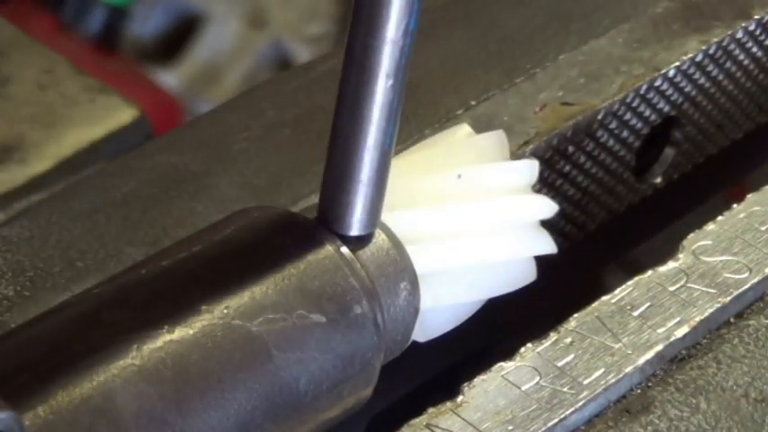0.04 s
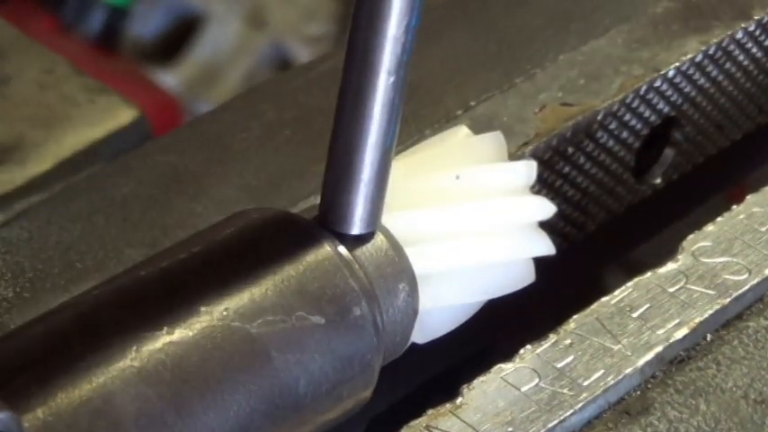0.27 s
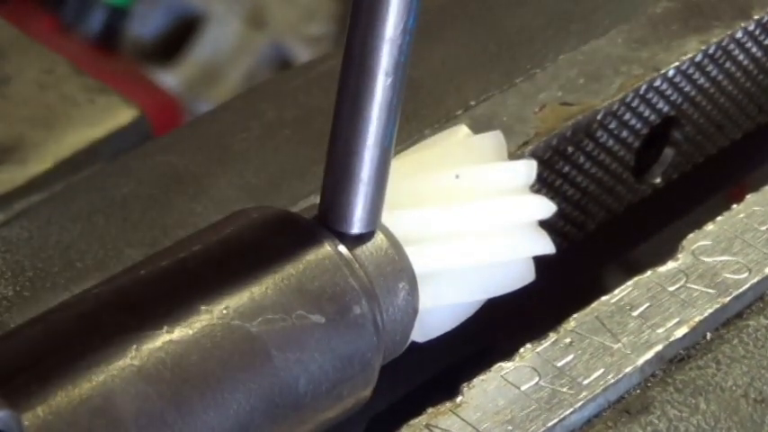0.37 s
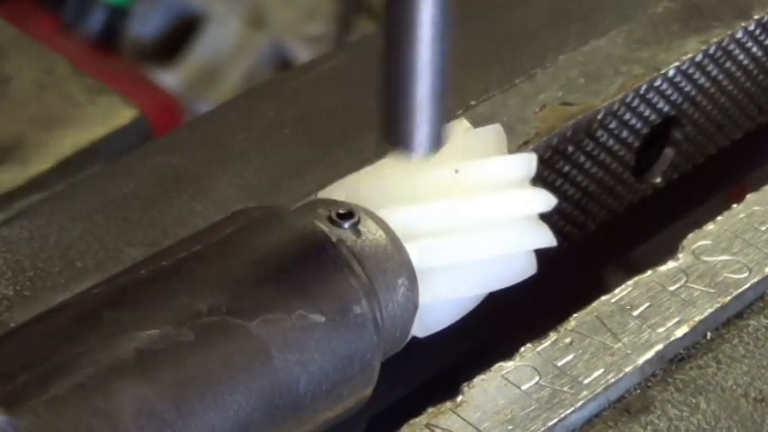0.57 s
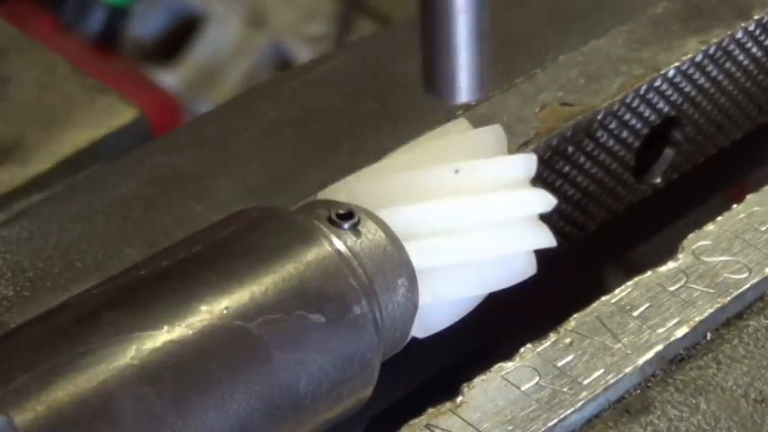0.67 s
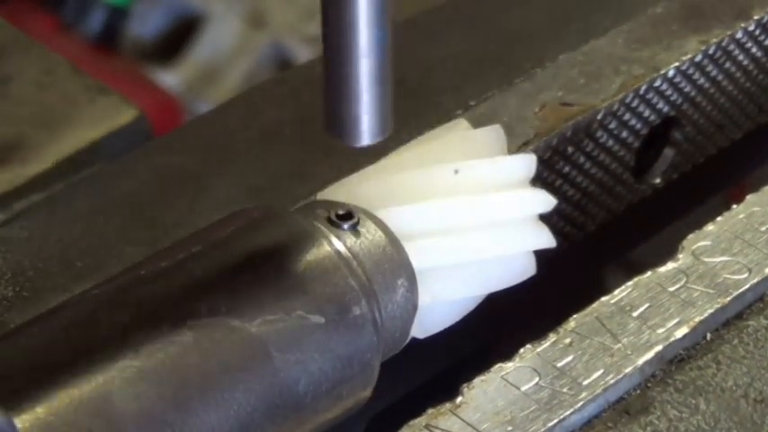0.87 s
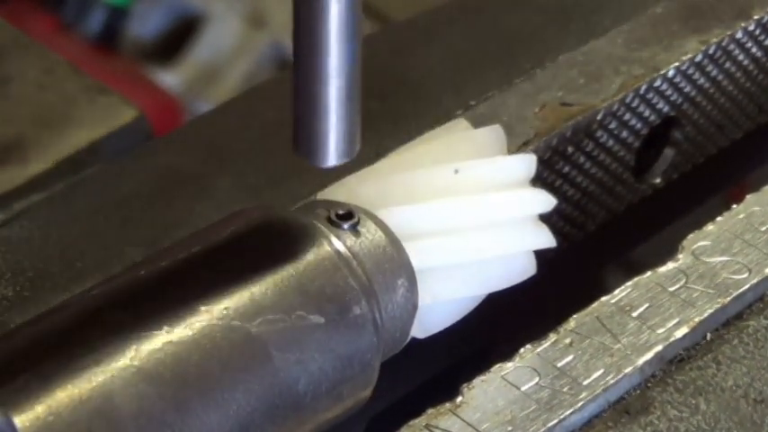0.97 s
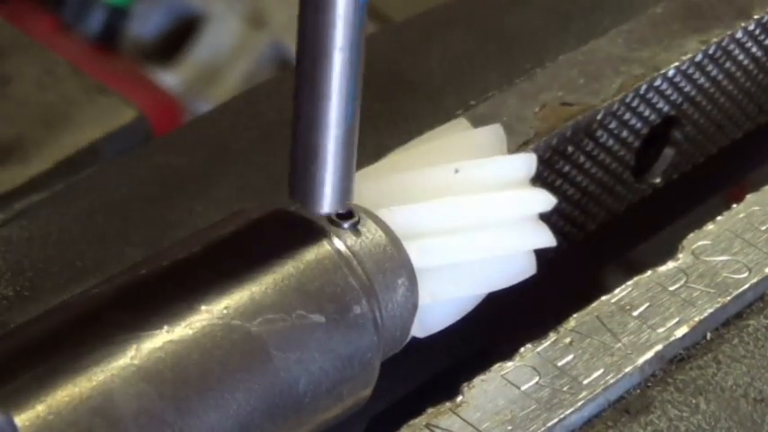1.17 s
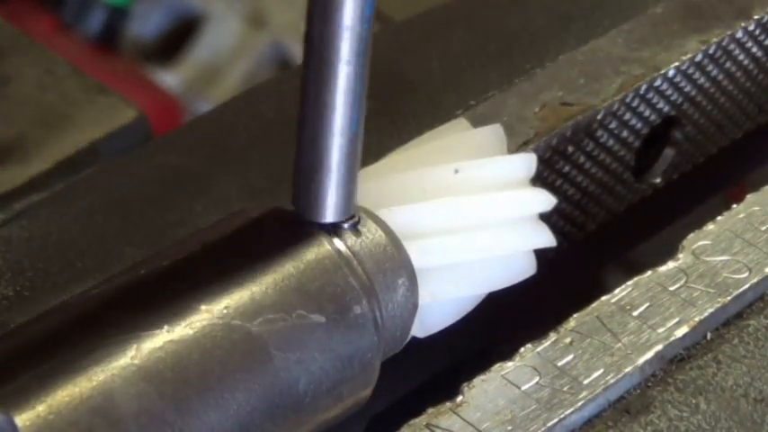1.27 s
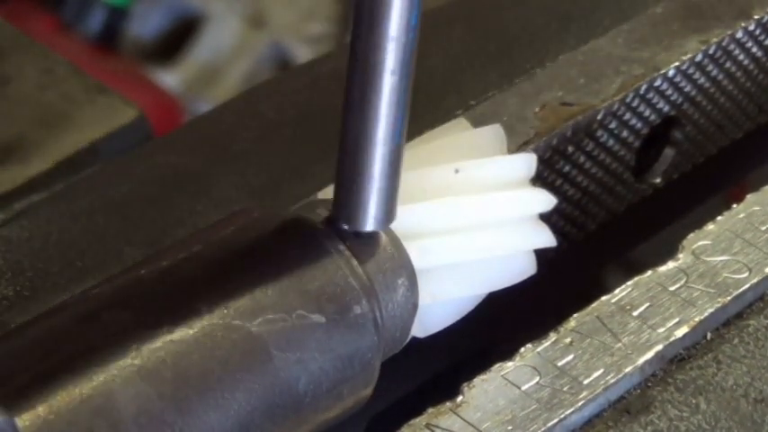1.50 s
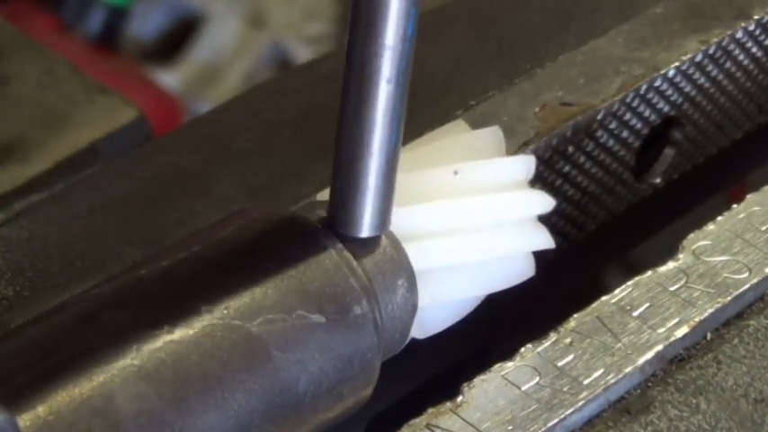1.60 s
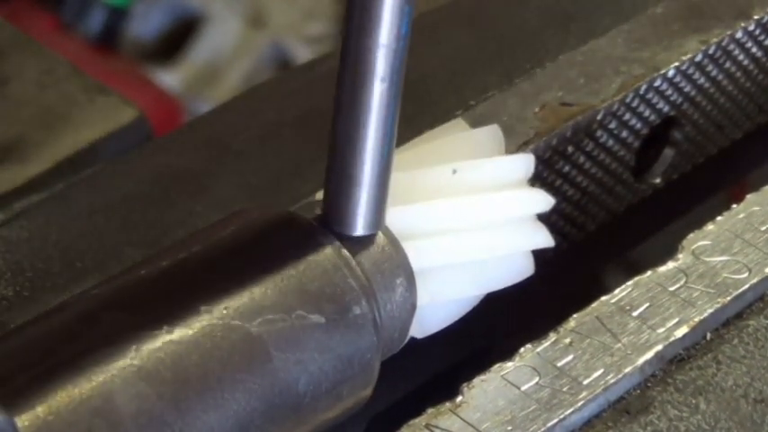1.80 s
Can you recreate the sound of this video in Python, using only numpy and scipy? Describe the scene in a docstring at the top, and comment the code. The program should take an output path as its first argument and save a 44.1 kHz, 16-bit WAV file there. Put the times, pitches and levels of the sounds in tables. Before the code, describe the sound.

One sharp, ringing hammer blow on a steel punch, then light ticks in a workshop.

```python
"""A small workshop with a low hum. At 0.2 s a hammer hits a steel punch held on a shaft in a vise, close by.
The blow cracks, chatters and rebounds, ringing punch, hammer head and vise. A dense room echo swells,
holds briefly and fades; a faint steel ring lingers. Near 0.5 s the punch ticks as it is lifted off.
From 1.3 s it is set down again and steered into place, with more ticks and a dull rub."""
import sys
import numpy as np
from scipy import signal
from scipy.fft import rfft, irfft
from scipy.io import wavfile

SR = 44100
rng = np.random.default_rng(int(sys.argv[2]) if len(sys.argv) > 2 else 0)


def digitize_waveform(pressure):
    """Quantize a signal to 16-bit integers and store it at the path in sys.argv[1].

    Rows of a 2-D input are taken as channels; values are limited to [-1, 1].
    """
    field = np.atleast_2d(pressure).T
    bounded = np.clip(field, -1, 1)
    quanta = np.round(bounded * 32767).astype(np.int16)
    wavfile.write(sys.argv[1], SR, quanta)


N = 81585

# Blow, chatter, rebound. Each row: start in seconds, then crack, punch, hammer and vise levels in dB.
HAMMER_HITS = [(0.2098, -13, -17.5, -35, -34), (.2128, -18, -50.5, -58.5, -48.5),
               (.2213, -20.5, -40, -51.5, -50), (.2540, -23, -38, -29.5, -36.5)]
# Modes of the punch and of the vise on its bench. Each row: frequency in Hz, level in dB, t60 in seconds.
PUNCH_MODES = [(3032, -19, .26), (4700, -6, .035), (6100, -6, .03), (6513, -17, .2), (7391, -19, .2),
               (8904, -12, .06), (9487, -6, .13), (9569, -3, .13), (9815, -11, .14), (10297, -10, .11),
               (10938, -3, .1), (11455, -12, .15), (11836, -16, .16)]
VISE_MODES = [(372, -8, .18), (441, -3, .15), (506, -2, .14), (635, -7, .11), (868, -5.5, .19),
              (1140, -6, .12), (1511, -12, .1), (1945, -8, .09), (2200, -8, .11), (2600, -11, .1),
              (2880, -8, .1), (3250, -10, .06)]

SLOW_RISE_S = .02  # vise ring and low tones after the blow
CONTACT_LOW_HZ = 260.1  # small parts radiate no bass


def undb(db):
    """Decibels to gain."""
    return 10 ** (np.asarray(db) / 20)


def db_at(table, hz):
    """Interpolate (Hz, dB) rows over log frequency."""
    rows = np.array(table, float)
    return np.interp(np.log(np.maximum(hz, 1)), np.log(rows[:, 0]), rows[:, 1])


def fade(t, t60):
    """Exponential decay, 60 dB down at t60."""
    return np.exp(-np.log(1000) * t / t60)


def low_cut(x, hz):
    """Third-order high-pass."""
    return signal.sosfilt(signal.butter(3, hz, "high", fs=SR, output="sos"), x)


def add(out, start_s, sound):
    """Mix a sound in at start_s."""
    i = int(start_s * SR)
    out[:, i:i + sound.shape[1]] += sound[:, :N - i]


def noise(spectrum, size, width=.36, colour_db=0):
    """Stereo noise shaped by (Hz, dB) rows, mid at rms 1. The default width suits close sounds."""
    # Diffuse field. Each row: frequency in Hz, side over mid in dB.
    side_spectrum = [(50, -31.5), (150, -25.5), (330, -15.5), (700, -4), (3000, -6), (6000, -6.5),
                     (10000, -17)]
    hz = np.fft.rfftfreq(size, 1 / SR)
    gain = undb(db_at(spectrum, hz) + colour_db)
    phasors = np.exp(2j * np.pi * rng.random((2, len(hz))))
    side_gain = width * undb(db_at(side_spectrum, hz))
    mid, side = irfft(gain * phasors * [np.ones(len(hz)), side_gain], size)
    return np.array([mid + side, mid - side]) / mid.std()


def ring(modes, size, t60_scale=1, rise_s=0.000091):
    """Struck modes: sines that swing up and fade, slightly out of phase between the ears."""
    t = np.arange(size) / SR
    out = np.zeros((2, size))
    for hz, db, t60 in modes:
        lag_rad = 0.11 * rng.standard_normal() * np.array([[1], [-1]])
        out += undb(db) * fade(t, t60 * t60_scale) * np.sin(2 * np.pi * hz * t + lag_rad)
    return out * (1 - np.exp(-t / rise_s))


def scatter(modes, spread_db=3):
    """Each point of contact wakes the modes a little differently."""
    return [(hz, db + spread_db * rng.standard_normal(), t60) for hz, db, t60 in modes]


def background():
    """Quiet workshop air and a wavering two-tone hum."""
    # Air spectrum and hum tones. Each row: frequency in Hz, relative level in dB.
    air_spectrum = [(25, -21), (55, 1.5), (90, -8.5), (160, -4), (260, -9.5), (480, -11.5), (900, -18),
                    (2000, -23.5), (5000, -28), (11000, -31), (15000, -31.5), (16000, -25.5)]
    hum_tones = [(117.5, -1), (161, -6)]
    # Hum envelope. Each row: time in seconds, level in dB.
    hum_envelope = [(0, -67.5), (.12, -62.5), (.19, -85.5), (.6, -67.5), (1.1, -70), (1.35, -71),
                    (1.55, -64.5), (1.7, -62.5), (1.85, -65)]
    t = np.arange(N) / SR
    knots_s = np.linspace(0, t[-1], 24)
    envelope_db = np.interp(t, *np.array(hum_envelope).T)
    out = undb(-63) * noise(air_spectrum, N, width=.8)
    for hz, db in hum_tones:
        waver_db = np.interp(t, knots_s, -0.5 * rng.standard_normal(len(knots_s)))
        drift_rad = np.interp(t, knots_s, 0.66 * rng.standard_normal(len(knots_s)))
        out += undb(db + envelope_db + waver_db) * np.sqrt(2) * np.sin(2 * np.pi * hz * t + drift_rad)
    return out


def room(x):
    """Short, dull workshop echo; the treble dies sooner."""
    t = np.arange(SR // 2) / SR
    hz = np.fft.rfftfreq(len(t), 1 / SR)
    diffuse = noise([(100, 0), (3500, 0), (16000, -14)], len(t), width=1)
    treble = irfft(rfft(diffuse) * (hz > 5000), len(t))
    response = (diffuse - treble) * fade(t, t60=.35) + treble * fade(t, t60=.28)
    response *= 1 - np.exp(-t / .004)
    response /= np.sqrt(np.sum(response[0] ** 2))
    return undb(-13) * signal.fftconvolve(x, response, axes=1)[:, :N]


def rubbing():
    """The punch rubs dully as it is steered into place."""
    # Each row: frequency in Hz, relative density in dB.
    spectrum = [(100, -25.5), (300, -6), (440, 8), (600, -9.5), (900, -4.5), (1500, -24), (6000, -37.5)]
    # Each row: time in seconds, level in dB.
    envelope = [(1.28, -80.5), (1.34, -60), (1.42, -69.5), (1.52, -69.5), (1.66, -73.5), (1.76, -87)]
    level_db = np.interp(np.arange(N) / SR, *np.array(envelope).T)
    return noise(spectrum, N) * undb(level_db)


def punch_ticks():
    """The punch leaves the shaft, lands and skips; each touch clicks and rings punch, shaft and vise."""
    # Each row: start in seconds, click level in dB, tilt in dB per octave, favoured band in Hz,
    # click t60 in seconds, then punch, shaft and vise levels in dB.
    touches = [(.4972, -50.5, 3, 7200, 0.034, -79.5, -83.5, -59.5),
               (0.5447, -35, 3, 1480, 0.04, -35.5, -39, -56.5),
               (0.5533, -37, 4, 9400, 0.011, -56, -59, -65),
               (1.2827, -42.5, -4, 4400, 0.031, -49, -75, -45),
               (1.2866, -42, -2, 592, 0.034, -72, -65, -65),
               (1.3331, -60, 10, 11000, 0.034, -72, -60, -56.5),
               (1.3443, -59, -2.5, 480, 0.045, -78, -83, -65), (1.611, -37, 1, 2523, .025, -60, -68, -67),
               (1.6153, -50, -3, 9000, 0.019, -66, -74, -72), (1.6202, -49, -7, 552, 0.065, -62, -63, -74),
               (1.6266, -40, 6, 8250, 0.011, -60, -71, -60.5)]
    # Each row: frequency in Hz, relative density in dB.
    click_spectrum = [(60, -47), (250, -13), (600, -6.5), (1600, -1), (3000, -2), (5000, -4), (8000, -4.5),
                      (11500, -7), (13500, -16), (16000, -27)]
    # Each row: frequency in Hz, level in dB, t60 in seconds.
    shaft_modes = [(1141, -5, .06), (1290, -12, .06), (1529, 0, .055), (1610, -5, .05), (1790, -3, .05),
                   (2611, -15, .13), (2950, -16, .12)]
    band_db, band_octaves = 6, 0.54  # each point of contact favours its own band
    out, size = np.zeros((2, N)), SR // 3
    t, hz = np.arange(size) / SR, np.fft.rfftfreq(size, 1 / SR)
    for start_s, click_db, tilt_db, band_hz, t60, punch_db, shaft_db, vise_db in touches:
        octaves = np.log2(np.maximum(hz, CONTACT_LOW_HZ) / band_hz)
        colour_db = tilt_db * octaves + band_db * np.exp(-(octaves / band_octaves) ** 2)
        click = undb(click_db) * noise(click_spectrum, size, colour_db=colour_db) * fade(t, t60)
        punch = undb(punch_db) * ring(scatter(PUNCH_MODES), size, t60_scale=.2)
        shaft = undb(shaft_db) * ring(shaft_modes, size)
        vise = undb(vise_db) * ring(scatter(VISE_MODES), size, rise_s=0.0026)
        add(out, start_s, click + punch + shaft + vise)
    return out


def swelling_echo():
    """After the blow a dense room echo swells, holds and fades, with low tones and a faint steel ring."""
    # Each row: band centre in Hz, relative density in dB, t60 in seconds.
    bands = [(30, -21, 0.51), (59.4, -3.5, 0.71), (150, -9.5, .5), (320, 4.5, 0.36), (480, 1, 0.36),
             (754, -4, 0.45), (1290, -2.5, 0.42), (1850, 5, 0.34), (2400, -5.5, 0.42), (3400, 1.5, 0.34),
             (4800, -7.5, 0.39), (6700, -4, 0.27), (8700, -10, 0.34), (9750, -0.5, .23), (11200, -4, 0.26),
             (12700, -14, .22), (16000, -24, .22)]
    # Each row: frequency in Hz, level in dB, t60 in seconds.
    low_tones = [(54, -54, .65), (76, -49, .3), (306, -32, .36), (441, -28, .24), (517, -33, .25),
                 (870, -41, .42), (1511, -29, .27), (1873, -26.5, .29), (2418, -43, .72), (2428, -44, .68)]
    steel_modes = [(2950, -9, 2.2), (3774, -10, 2.1), (4048, -7, 2.1), (4535, -8, 1.8), (4554, -2, 2.4),
                   (5050, -12, 2), (5432, -7, 1.9), (6471, -4, 1.6), (6788, -6, 1.4), (7967, -6, 1.5),
                   (8090, -5, .9), (8900, -6, 1.1)]
    start_s, hold_s = HAMMER_HITS[0][0], 0.038
    out, t = np.zeros((2, N)), np.arange(SR) / SR
    spectrum, hz = rfft(noise(bands, SR, width=1)), np.fft.rfftfreq(SR, 1 / SR)
    centres_hz = np.array(bands)[:, 0]
    for share, (centre_hz, _, t60) in zip(np.eye(len(bands)), bands):
        band = irfft(spectrum * np.interp(hz, centres_hz, share), SR)
        rise_s = 0.025 * (1000 / centre_hz) ** 0.24  # lows come later
        envelope = (1 - np.exp(-t / rise_s)) * fade(np.maximum(t - hold_s, 0), t60)
        add(out, start_s, undb(-22) * band * envelope)
    add(out, start_s, ring(low_tones, N, rise_s=SLOW_RISE_S))
    add(out, start_s, undb(-57) * ring(steel_modes, N))
    return out


def hammer_blow():
    """Steel on steel: each hit cracks and rings punch, hammer head and vise."""
    # Each row: frequency in Hz, relative density in dB.
    crack_spectrum = [(100, -15.5), (400, -17.5), (1200, -2.5), (2500, -0.5), (5000, -4), (7500, -2),
                      (10500, 3.5), (13000, -0.5), (16000, -13.5)]
    # Each row: frequency in Hz, level in dB, t60 in seconds.
    hammer_modes = [(6513, -10, .15), (10836, 0, .15)]
    out, size = np.zeros((2, N)), SR // 2
    t = np.arange(size) / SR
    for start_s, crack_db, punch_db, hammer_db, vise_db in HAMMER_HITS:
        crack = undb(crack_db) * noise(crack_spectrum, size) * fade(t, t60=.03)
        punch = undb(punch_db) * ring(PUNCH_MODES, size)
        hammer = undb(hammer_db) * ring(hammer_modes, size)
        vise = undb(vise_db) * ring(VISE_MODES, size, rise_s=SLOW_RISE_S)
        add(out, start_s, crack + punch + hammer + vise)
    return out


def scene():
    """The work and its echo, slightly to the left, over the background."""
    # Each row: frequency in Hz, left minus right in dB.
    balance = [(70, -1), (170, 2), (350, 3), (700, 4), (1400, 3.3), (2800, 0.54), (5500, 1.6), (13000, 0.6)]
    contacts = low_cut(hammer_blow() + punch_ticks() + rubbing(), CONTACT_LOW_HZ)
    work = contacts + room(contacts) + swelling_echo()
    balance_db = db_at(balance, np.fft.rfftfreq(N, 1 / SR))
    ear_gains = undb(np.array([balance_db, -balance_db]) / 2)
    return irfft(rfft(work) * ear_gains, N) + background()


def record(dry):
    """Band-limit to 36 Hz - 16.1 kHz."""
    low_pass = signal.ellip(10, .2, 80, 16100, fs=SR, output="sos")
    return signal.sosfilt(low_pass, low_cut(dry, 36))


dry = scene()
out = record(dry)
digitize_waveform(out)
```